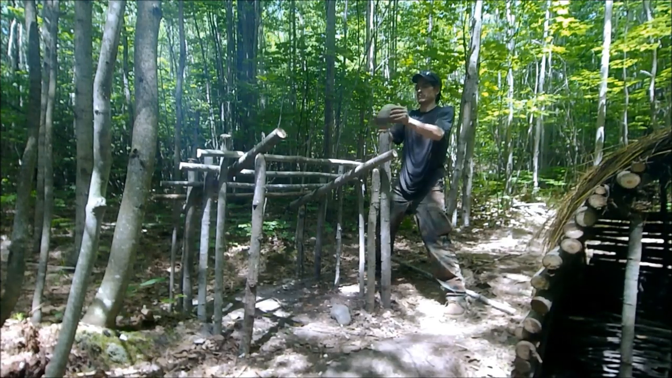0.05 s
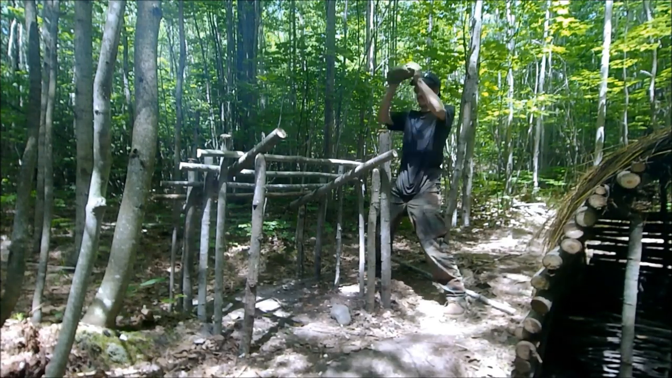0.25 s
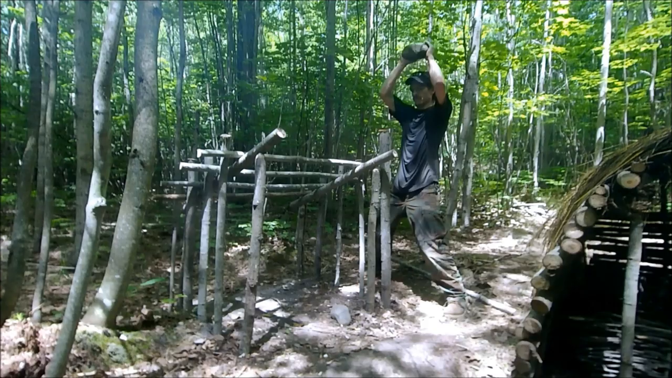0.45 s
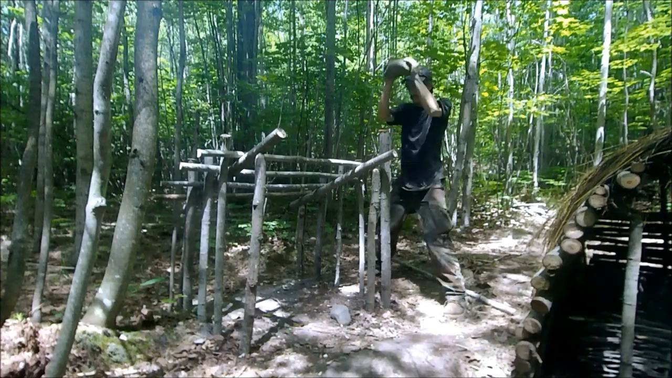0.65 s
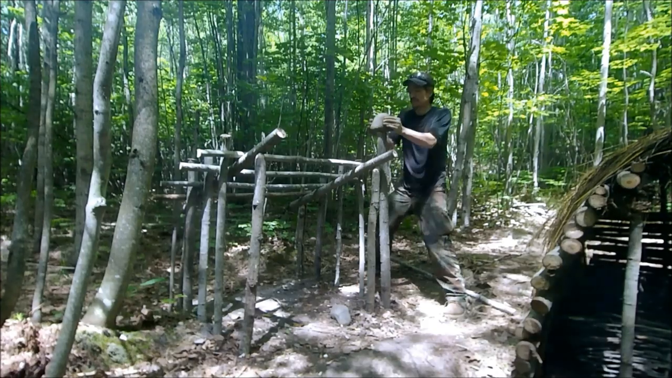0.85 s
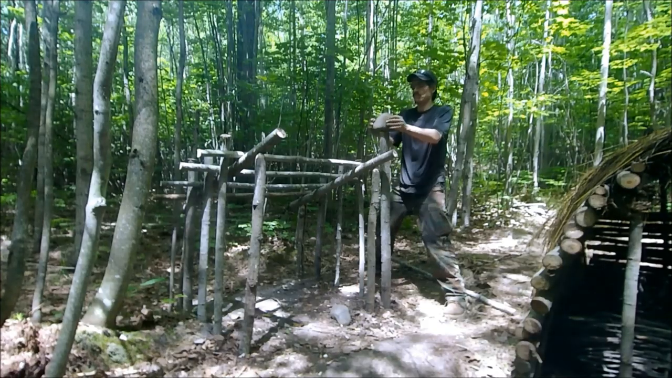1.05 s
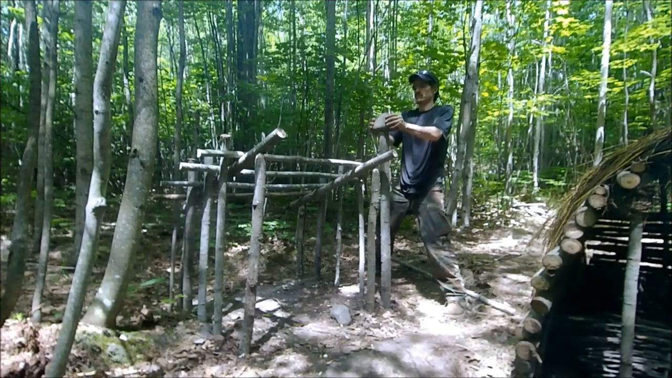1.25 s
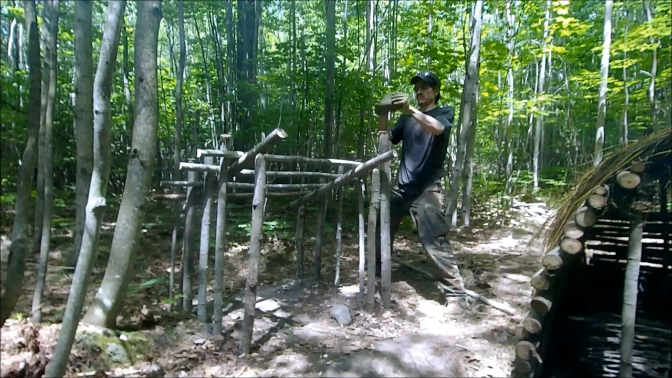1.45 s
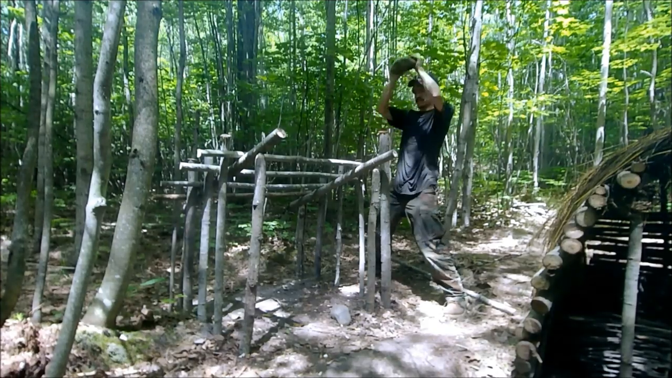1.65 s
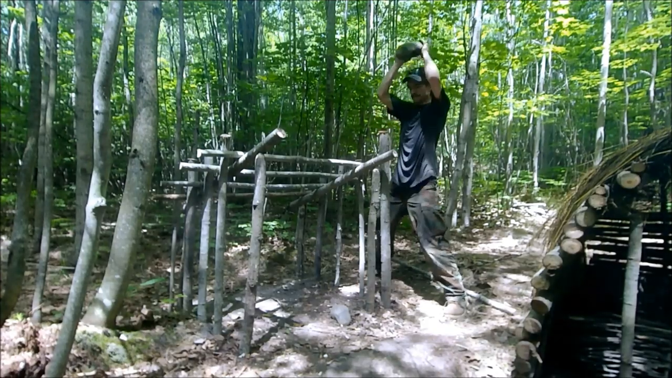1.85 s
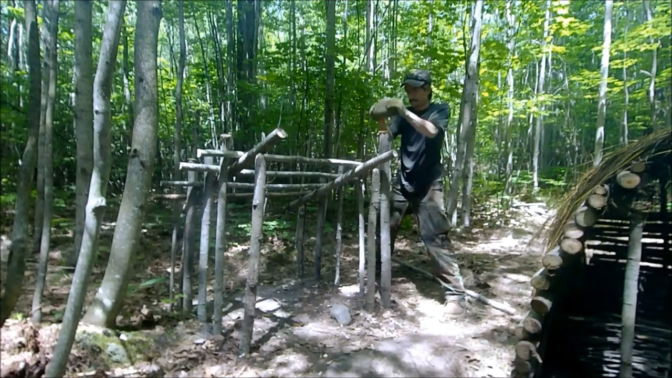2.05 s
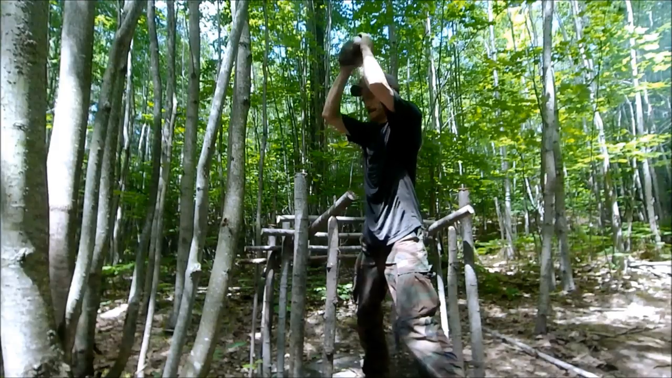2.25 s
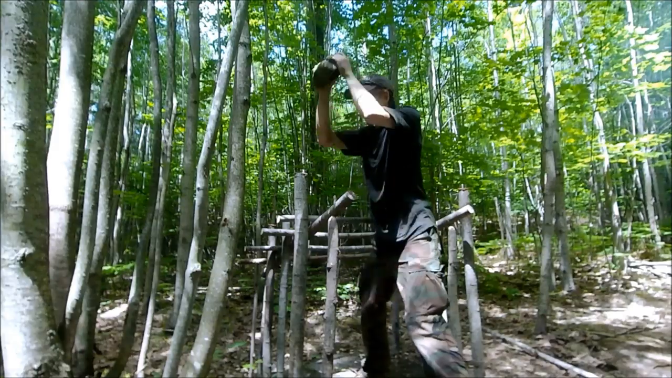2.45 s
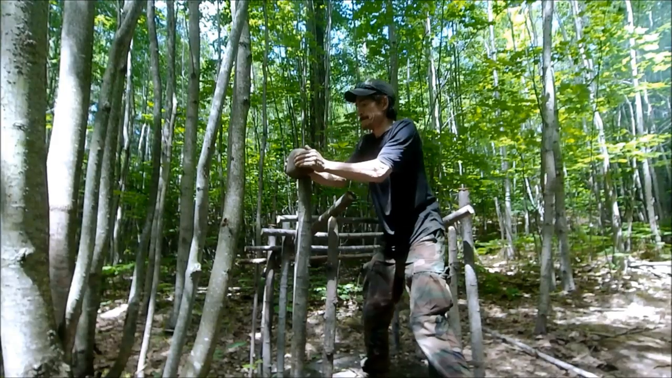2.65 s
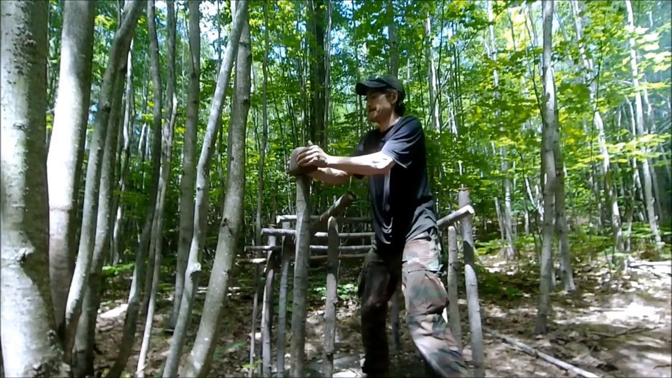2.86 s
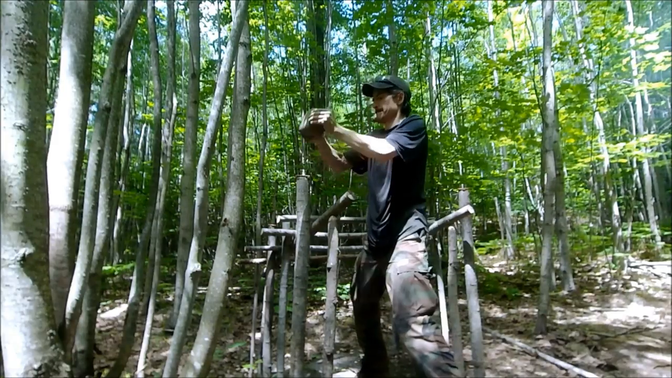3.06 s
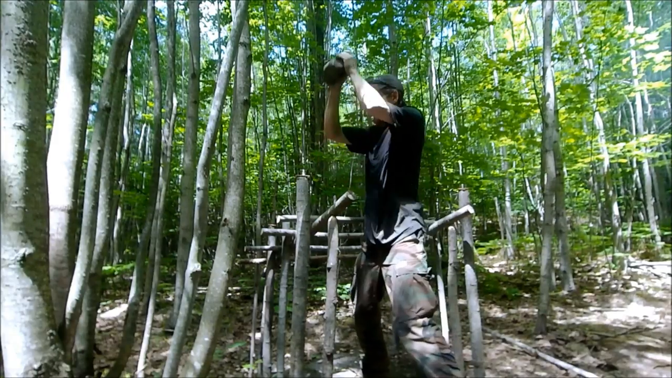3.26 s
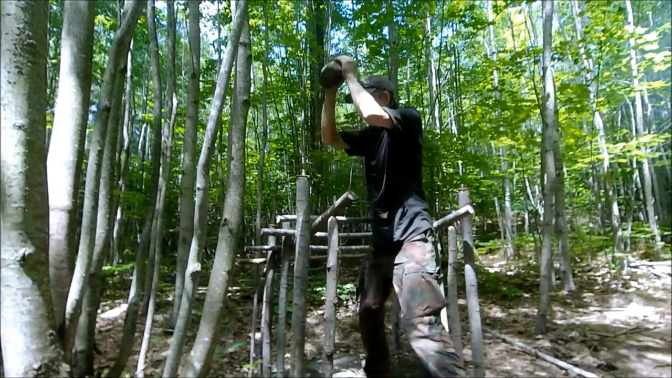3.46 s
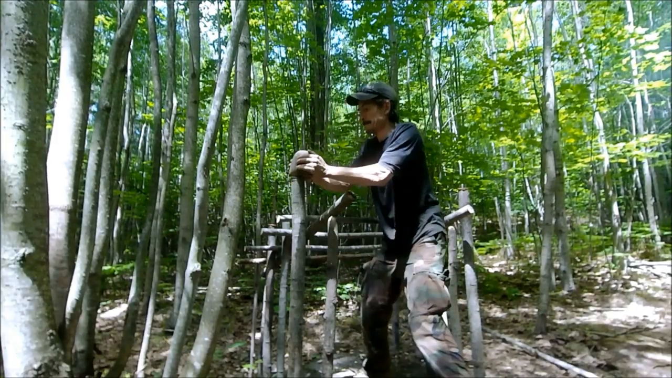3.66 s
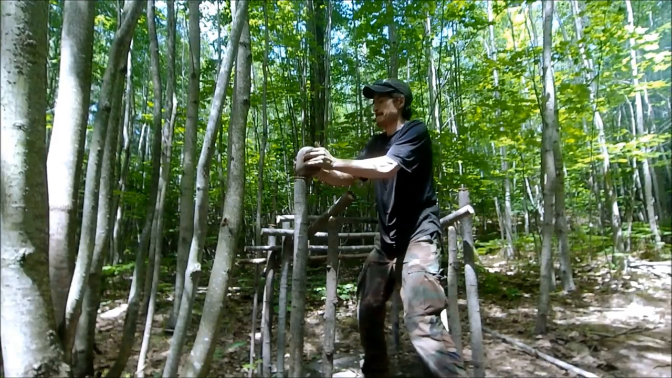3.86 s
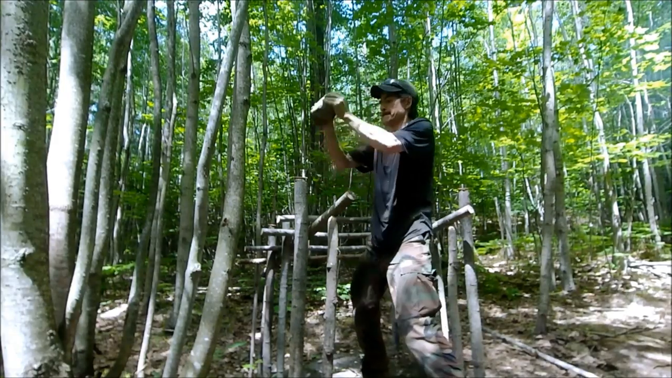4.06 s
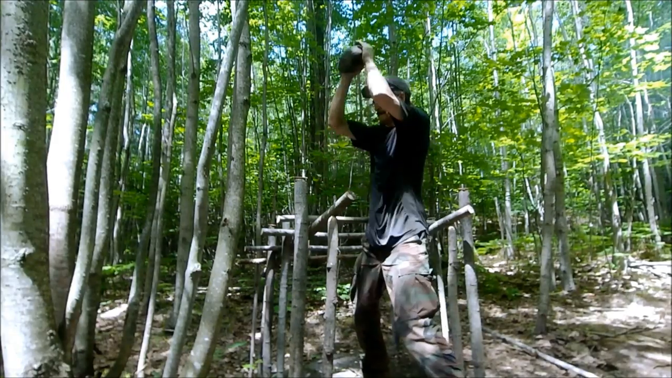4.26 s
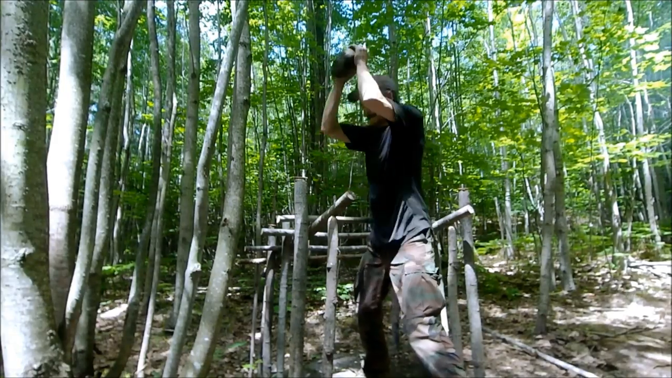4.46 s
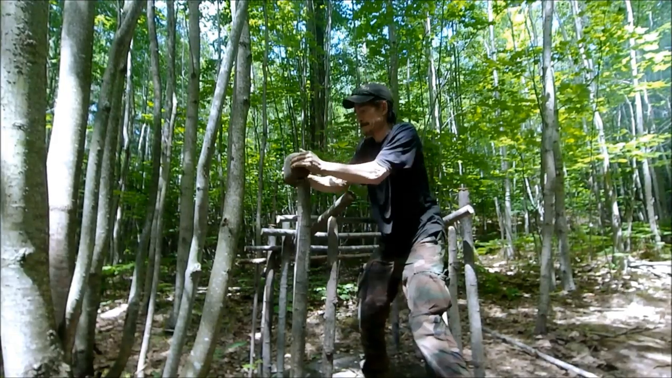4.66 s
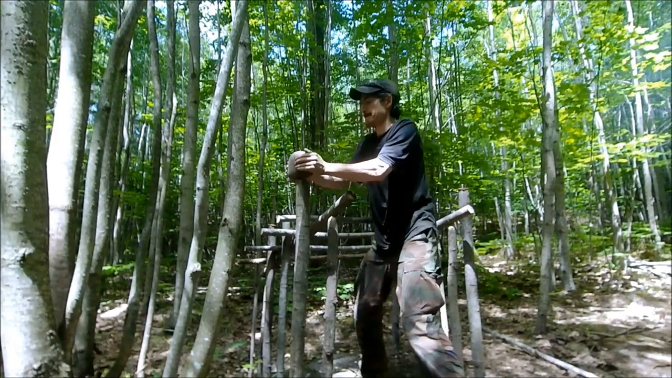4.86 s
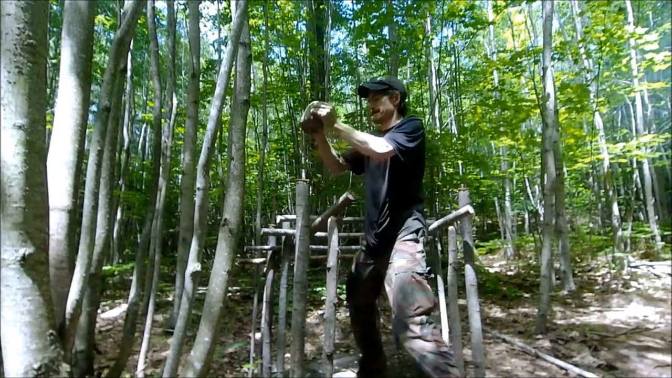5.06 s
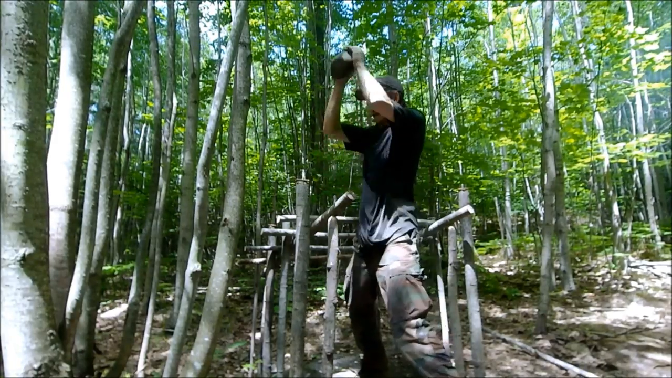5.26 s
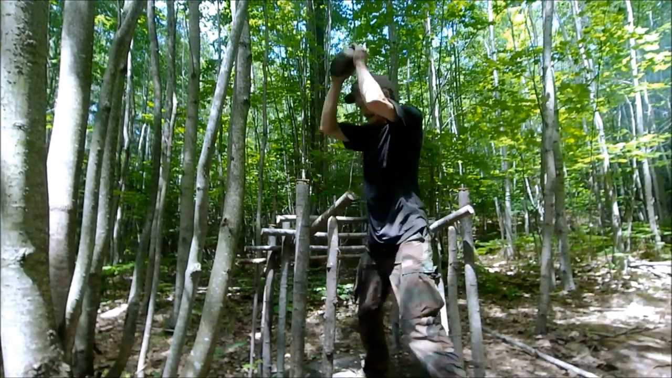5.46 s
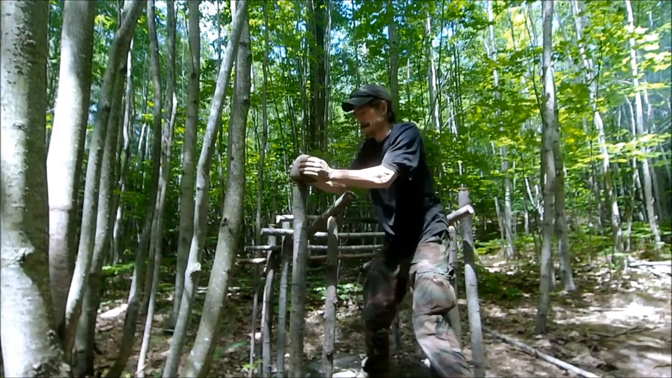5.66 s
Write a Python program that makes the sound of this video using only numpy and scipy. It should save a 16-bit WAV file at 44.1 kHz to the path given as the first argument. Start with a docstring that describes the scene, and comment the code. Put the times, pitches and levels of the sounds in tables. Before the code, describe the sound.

In a quiet forest, faint birds pip and warble above soft hiss and low air rumble. Two hard knocks of stone on a wooden post come first, followed by four closer, brighter ones at a steady pace. Every hit cracks, thuds into the ground and scatters back from the trunks, loud enough to distort the microphone a little. Tiny twig ticks and leaf scuffs fall in the gaps.

```python
"""In a forest, a rock held in both hands drives wooden posts into the soil: two blows on one post,
then four on a nearer one. Each blow cracks, rings the post briefly and thumps the ground,
overloading the microphone; the trunks scatter it back. Twigs tick, dry leaves scuff and three
small birds call among the trees, over a bed of light air rumble and hiss."""
import sys
import numpy as np
from scipy import signal
from scipy.fft import rfft, irfft, next_fast_len
from scipy.io import wavfile
from scipy.ndimage import uniform_filter1d, map_coordinates

SR = 44100
rng = np.random.default_rng(int(sys.argv[2]) if len(sys.argv) > 2 else 0)


def put_to_file(sound):
    """Save the sound as 16-bit audio at rate SR, in the file named by the first command-line argument."""
    columns = np.atleast_2d(sound).T  # one column per channel
    safe = np.clip(columns, -1, 1)
    whole_steps = np.round(safe * 32767)
    wavfile.write(sys.argv[1], SR, whole_steps.astype(np.int16))


N = 252252
T = np.arange(N) / SR

# Noise colours. Each row: frequency in Hz, relative level in dB.
RUMBLE_EQ = [(5, -1), (14, 6.5), (28, -12), (40, -17.5), (70, -15.5), (130, -29.5), (250, -43.5),
             (550, -100)]  # air on the microphone
HISS_EQ = [(150, 4.5), (350, 1), (1000, -3), (1600, -7), (3100, -4.5), (4200, -7.5), (5500, -7.5),
           (7000, -7), (10000, -7.5), (12400, -4.5), (13000, 0), (14300, -1.5), (15600, -3.5), (16000, -22)]
CRACK_EQ = [(300, -10.5), (1000, 2.5), (2500, -1.5), (4300, -7.5), (7000, -10), (10000, -22),
            (15500, -30.5)]  # stone crushing end grain
GRIT_EQ = [(3000, -19.5), (8000, -5.5), (11500, -3), (14500, 4), (16000, 0.5)]  # grains crushed under the rock
ECHO_EQ = [(40, 5), (100, 12.5), (180, -3.5), (350, -10.5), (550, -7.5), (750, -1.5), (1100, -2),
           (1600, -4), (2100, -7), (4000, -11), (7000, -20.5), (11000, -23.5), (16000, -31)]  # the trunks' answer
BOOM_EQ = [(25, -20), (55, 1.5), (90, 3.5), (140, -6.5), (220, -27), (500, -53.5), (1500, -100)]  # the thump returning from far ground
LEAF_EQ = [(500, -11.5), (3000, -13), (4300, -2), (8000, -4), (15000, -8)]

# Bird notes. Each row: offset in seconds, length in seconds, start and end pitch in Hz, level in dB.
PIP_NOTES = [(0.0036, 0.037, 6400, 9500, -67)]
WARBLE_NOTES = [(0, .038, 3500, 4740, -4), (.033, 0.053, 3686, 2460, -1), (.185, .058, 3960, 2620, 1.5),
                (.257, .066, 3560, 2680, -6)]
CALL_NOTES = [(0, .23, 3302, 3866, 0.058), (.165, .075, 3615, 2908, .5)]
DOWNSLUR_NOTES = [(0, .057, 3950, 2400, 0)]
CHIP_NOTES = [(0, .014, 9400, 8216, -53.5), (.012, .008, 6320, 4897, -54)]
# The songbird's cues. Each row: start in seconds, pitch factor on the notes, gain in dB.
WARBLE_CUES = [(.333, .965, -54.5), (3.275, 1.03, -50.5), (4.61, 1.12, -55.5)]
CALL_CUES = [(1.181, 1.002, -56), (2.178, 1.01, -66)]
DOWNSLUR_CUES = [(3.233, 1.1, -54)]

# The rock's hits. Each row: start in seconds, knock, crack and grit gains in dB,
# brightness in dB per octave, pitch factor of the post.
HITS = [(0.7741, -1.5, -23.5, -34, 0.3, 1.01), (2.1064, 0, -24, -44, -0.1, 1.005),
        (2.6357, -1.5, -19, -24.5, -1.2, 0.98), (3.6442, 1.5, -13, -50, 0.1, 0.98),
        (4.6742, 0.5, -19.5, -41, -0.66, 1.015), (5.6789, 5, -20, -28, -3.5, 0.98)]
# Modes of each post and of the soil rocking around it.
# Each row: frequency in Hz, level in dB, time to fade 60 dB (t60) in seconds.
FAR_POST_MODES = [(284, -6, 0.031), (435, -5.5, 0.052), (520.3, -7, .026), (666, -1.5, 0.031),
                  (794, -10.5, 0.019), (880, -11, .033), (1127, -14.5, 0.032), (1473, -14, .027),
                  (1800, -7, 0.019), (2010, -16.5, 0.011), (2325, -22, 0.028), (2864, -24.5, 0.028),
                  (3646, -20.5, 0.016)]
NEAR_POST_MODES = [(394, -0.76, 0.032), (491.4, -6.5, 0.027), (732, 2.6, 0.025), (753, -8, 0.024),
                   (832.7, 2.5, 0.024), (1043, -13, 0.024), (1140, -8.5, 0.035), (1330, -17.5, 0.069),
                   (1406, -8, 0.036), (1526, -7.5, 0.021), (1672, -2.5, 0.027), (1970, -19, 0.045),
                   (2224, -11.5, 0.018), (2644, -12.5, 0.029), (2745, -12, 0.027), (3370, -17, 0.018),
                   (4190, -22.5, 0.035), (4440, -20.5, 0.038)]
FAR_SOIL_MODES = [(62, -8.5, 0.1), (81, -6.5, 0.16), (105, 10.5, 0.039), (184, 9.5, 0.022)]
NEAR_SOIL_MODES = [(67.4, -6, 0.12), (108.05, 8.5, 0.047), (153, 14.5, 0.019), (216, 16, 0.014)]
# Each pair: far post, near post.
SEATING_S = [0.0022, .0001]  # first touch to full contact in seconds
ECHO_SEND_DB = [-23.5, -19.5]  # gain of the trunks' answer against the knock in dB
BOOM_GAIN_DB = [-39, -48]  # gain of the returning thump in dB
# Absorption by leaves and air. Each row: frequency in Hz, t60 in seconds.
FOREST_DECAY = [(60, 1.4), (300, 4.6), (1100, 3.9), (3000, 2), (7000, 2.7), (15000, 0.93)]

# Twig ticks. Each row: start in seconds, relative level in dB, pitch in Hz, t60 in seconds.
TWIG_TICKS = [(0.955, -31, 7940, 0.02), (1.006, -27.5, 8000, 0.023), (1.0548, -25, 9300, 0.0097),
              (1.089, -36.5, 6200, .019), (1.5352, -38, 13600, .0075), (1.608, -35.5, 5700, 0.03),
              (1.6339, -30, 7760, 0.015), (2.454, -33, 1320, 0.016), (4.1744, -28.5, 9600, 0.012)]
# Feet in dry leaves. Each row: centre in seconds, level in dB, width in seconds.
LEAF_SCUFFS = [(2.876, -48, 0.013), (4.851, -50, 0.027)]

PIP_START_S, PIP_GAP_S = .24, .326
CHIP_START_S, CHIP_GAP_S, CHIP_HURRY_S = 2.583, .47, .014  # each gap shrinks by the hurry
CHIP_SAG, CHIP_SCATTER = .0033, .01  # shares of the pitch: drop per chip, random spread
GRIT_T60_S, GRIT_TAIL_DB, GRIT_TAIL_T60_S = .02, -19, .1  # a burst, then scatter off close trunks
NEAR_POST_S = 2.312  # hard cut to the near post, chopping the far one's echo
TOP_HZ = 15900


def amp(db):
    """Decibels to gain."""
    return 10 ** (np.asarray(db) / 20)


def unit(x):
    """Scale to rms 1."""
    return x / np.sqrt(np.mean(x ** 2) + 1e-20)


def along(points, hz):
    """Read (Hz, value) points on a log axis."""
    f, v = np.transpose(points)
    return np.interp(np.log(hz + 1), np.log(f + 1), v)


def filtered(x, response):
    """EQ x with a gain curve over frequency."""
    m = next_fast_len(len(x) + 8192)
    return irfft(rfft(x, m) * response(np.fft.rfftfreq(m, 1 / SR)), m)[:len(x)]


def noise(spectrum, size):
    """Coloured noise of rms 1."""
    return unit(filtered(rng.standard_normal(size), lambda hz: amp(along(spectrum, hz))))


def wobble(rate):
    """A smooth random curve, rate knots a second."""
    return map_coordinates(rng.standard_normal(int(N * rate / SR) + 4), [T * rate])


def add(track, s, sound):
    """Mix a sound into the track at s seconds."""
    part = track[max(round(s * SR), 0):][:len(sound)]
    part += sound[:len(part)]


def background():
    """The bed: light air on the microphone, even hiss and a thin electronic whine."""
    rumble = amp(-47 + 2.8 * wobble(3.5)) * noise(RUMBLE_EQ, N)
    hiss = amp(-62 + .4 * wobble(1.2)) * noise(HISS_EQ, N)
    whine = amp(-75) * np.sin(2 * np.pi * 15000 * T)
    return rumble + hiss + whine


def slur(length, start_hz, end_hz):
    """One quavering whistle with soft ends: it glides fast, then eases into its last pitch."""
    u = np.linspace(0, 1, int(length * SR))
    hz = end_hz + (start_hz - end_hz) * (1 - u) ** 1.8
    quaver = map_coordinates(rng.standard_normal(size=64), [u * length * 300], mode='mirror')
    phase = 2 * np.pi * np.cumsum(hz * (1 + .025 * quaver)) / SR
    return np.sin(phase) * signal.windows.tukey(len(u), .5)


def sing(notes, cues):
    """A bird repeats one phrase on each cue, transposed and at the cue's gain."""
    out = np.zeros(N)
    for s, pitch, db in cues:
        for after, length, start_hz, end_hz, note_db in notes:
            add(out, s + after, amp(db + note_db) * slur(length, pitch * start_hz, pitch * end_hz))
    return out


def canopy(x, t60, direct_db):
    """A far call arrives mostly as a wash of reflections that takes a moment to build."""
    t = np.arange(SR) / SR
    tail = rng.standard_normal(SR) * amp(-60 * t / t60) * (1 - np.exp(-t / .015))
    return amp(direct_db) * x + signal.fftconvolve(x, tail / np.linalg.norm(tail))[:N]


def birds():
    """One bird takes turns between its phrases, a second chips ever faster, a third pips far away."""
    song = sing(WARBLE_NOTES, WARBLE_CUES) + sing(CALL_NOTES, CALL_CUES)
    song += sing(DOWNSLUR_NOTES, DOWNSLUR_CUES)
    k = np.arange(8)
    chip_times = CHIP_START_S + k * CHIP_GAP_S - CHIP_HURRY_S * k * (k - 1) / 2
    chip_pitches = 1 - CHIP_SAG * (k - k.mean()) + CHIP_SCATTER * rng.standard_normal(len(k))
    chips = sing(CHIP_NOTES, [(s, pitch, 0) for s, pitch in zip(chip_times, chip_pitches)])
    pips = sing(PIP_NOTES, [(s, 1, 0) for s in np.arange(PIP_START_S, N / SR, PIP_GAP_S)])
    return (canopy(song, t60=.97, direct_db=-5.5)
            + canopy(chips, t60=.97, direct_db=-6.5)
            + canopy(pips, t60=.22, direct_db=-1.5))


def rock_bite(t, crack_db, grit_db):
    """The attack: fibres give way in tiny snaps and grit crushes; close trunks prolong both."""
    flicker = unit(uniform_filter1d(rng.standard_normal(len(t)), size=14))
    snaps = unit(amp(3.2 * flicker))
    crack_shape = (1 - np.exp(-t / .0005)) * (amp(5 - 60 * t / .03) + amp(-11.5 - 60 * t / .062))
    grit_shape = amp(-60 * t / GRIT_T60_S) + amp(GRIT_TAIL_DB - 60 * t / GRIT_TAIL_T60_S)
    crack = amp(crack_db) * noise(CRACK_EQ, len(t)) * crack_shape
    grit = amp(grit_db) * noise(GRIT_EQ, len(t)) * grit_shape
    return snaps * (crack + grit)


def ring(modes, t, rise, scatter_db, detune, alternate):
    """Damped modes struck at t = 0, varied at every blow; those of a bar alternate in sign."""
    hz, db, t60 = np.transpose(modes)[:, :, None]
    luck = rng.standard_normal((len(modes), 2))
    age = np.maximum(t, 0)
    sign = (-1) ** (np.arange(len(modes)) * alternate)
    decays = amp(db + scatter_db * luck[:, :1] - 60 * age / t60)
    tones = np.sin(2 * np.pi * hz * (1 + detune * luck[:, 1:]) * age)
    return sign @ (decays * tones) * (1 - np.exp(-age / rise))


def trunks(t, near_s, spread):
    """Echoes off ever farther trunks thin out as a power of time while leaves absorb the treble."""
    hz, when, spectra = signal.stft(noise(ECHO_EQ, len(t)), SR, nperseg=256)
    absorption = amp(-60 * when / along(FOREST_DECAY, hz)[:, None])
    tail = signal.istft(spectra * absorption, SR, nperseg=256)[1][:len(t)]
    return tail * (1 - np.exp(-t / .0039)) * (1 + t / near_s) ** -spread


def post_knock(t, post, knock_db, bright_db, pitch):
    """The body: wood rings and echoes. A harder corner of rock makes a shorter, brighter contact."""
    modes = (FAR_POST_MODES, NEAR_POST_MODES)[post]
    ring_time = pitch * (t - SEATING_S[post])
    knock = ring(modes, ring_time, rise=.00074, scatter_db=-.4, detune=.0075, alternate=True)
    echo = amp(ECHO_SEND_DB[post]) * trunks(t, near_s=.019, spread=1.35)
    tilted = filtered(knock + echo, lambda hz: amp(bright_db * np.log2(1 + np.minimum(hz, 4000) / 800)))
    return amp(knock_db) * tilted


def soil_thump(t, post):
    """The low end: soil takes the rock's weight, the same each time, and far ground booms back."""
    modes = (FAR_SOIL_MODES, NEAR_SOIL_MODES)[post]
    lag_s = .0054 + .45 * SEATING_S[post]
    thump = ring(modes, t - lag_s, rise=.0064, scatter_db=.2, detune=.003, alternate=False)
    thump = signal.sosfilt(signal.butter(2, 35, 'high', fs=SR, output='sos'), thump)
    swell = np.exp(-.5 * (np.log((t + 1 / SR) / .13) / .26) ** 2)  # peaks 0.13 s after the hit
    return thump + amp(BOOM_GAIN_DB[post]) * noise(BOOM_EQ, len(t)) * swell


def pounding():
    """The rock bites the post, the post rings, and a moment later the soil takes the load."""
    posts, t = np.zeros((2, N)), np.arange(SR) / SR
    for s, knock_db, crack_db, grit_db, bright_db, pitch in HITS:
        post = int(s > NEAR_POST_S)  # 0 far, 1 near
        bite = rock_bite(t, crack_db, grit_db)
        wood = post_knock(t, post, knock_db, bright_db, pitch)
        add(posts[post], s, bite + wood + soil_thump(t, post))
    return posts[0] * (T < NEAR_POST_S) + posts[1]


def litter():
    """Twigs tick and leaves scuff on the forest floor."""
    ticks, t = np.zeros(N), np.arange(SR // 8) / SR
    for s, db, hz, t60 in TWIG_TICKS:
        colour = [(hz / 8, -16), (hz / 2, -7), (hz, 0), (hz * 2, -6), (hz * 4, -18)]
        add(ticks, s, amp(db - 10 - 60 * t / t60) * noise(colour, len(t)))
    scuffing = sum(amp(db) * np.exp(-.5 * ((T - s) / width) ** 2) for s, db, width in LEAF_SCUFFS)
    crackle = unit(noise(LEAF_EQ, N) * amp(2.5 * wobble(440)))
    return ticks + scuffing * crackle


def scene():
    """The mono mix at one microphone."""
    return (pounding() + litter() + birds() + background())[None]


def record(dry):
    """The blows overload the input; a steep low-pass trims the very top."""
    hardness = 8
    clipped = dry[0] / (1 + np.abs(dry[0]) ** hardness) ** (1 / hardness)
    return filtered(clipped, lambda hz: 1 / np.sqrt(1 + (hz / TOP_HZ) ** 120))[None]


dry = scene()
out = record(dry)
put_to_file(out)
```